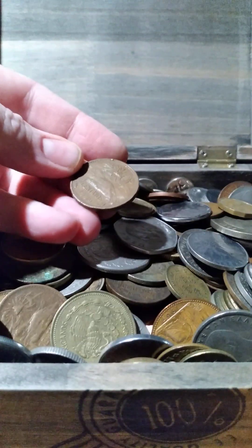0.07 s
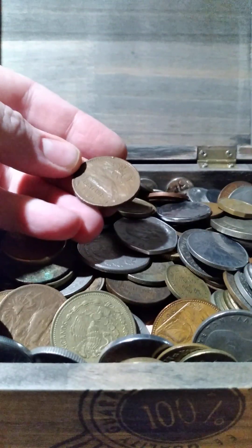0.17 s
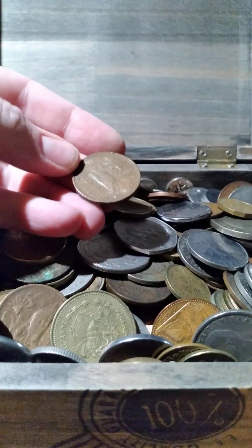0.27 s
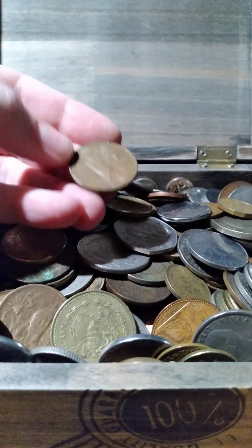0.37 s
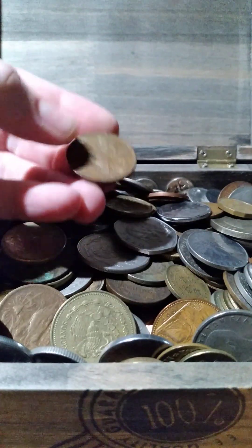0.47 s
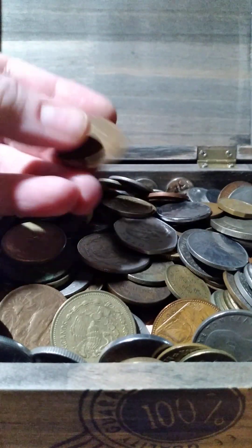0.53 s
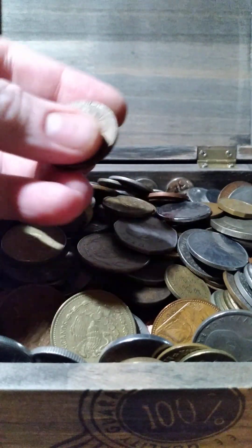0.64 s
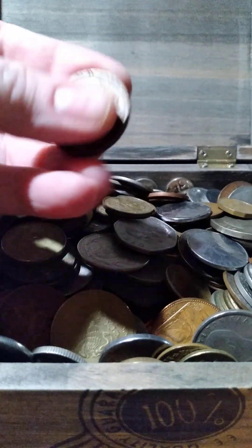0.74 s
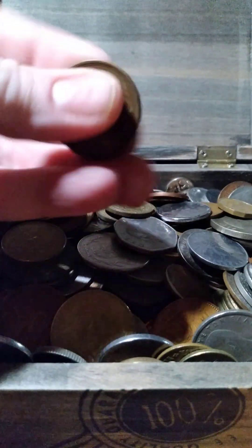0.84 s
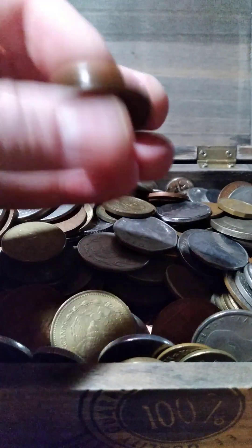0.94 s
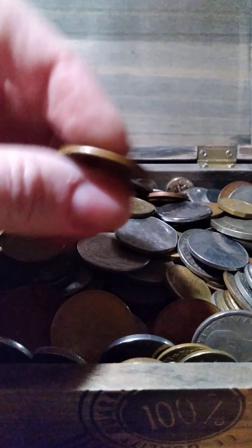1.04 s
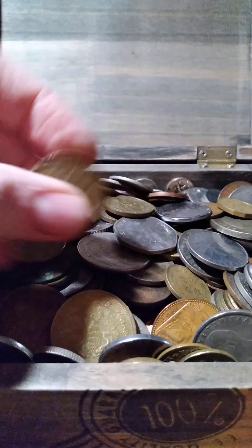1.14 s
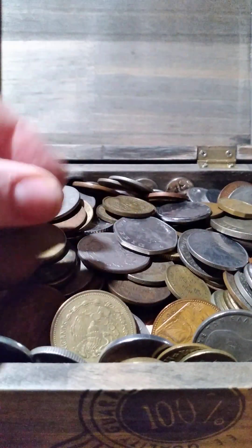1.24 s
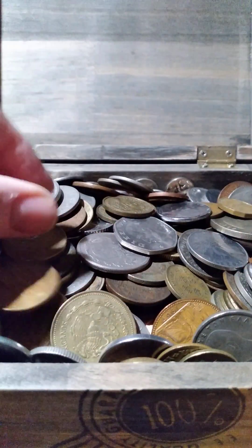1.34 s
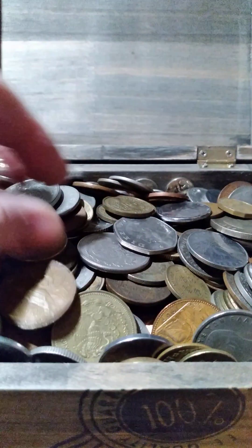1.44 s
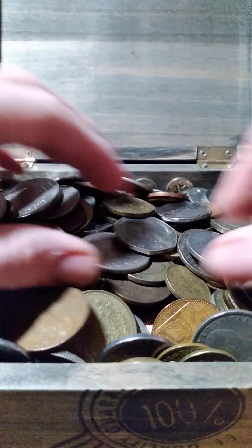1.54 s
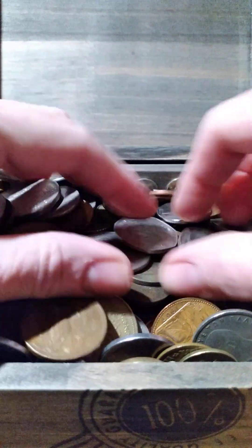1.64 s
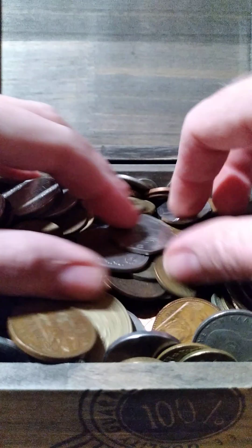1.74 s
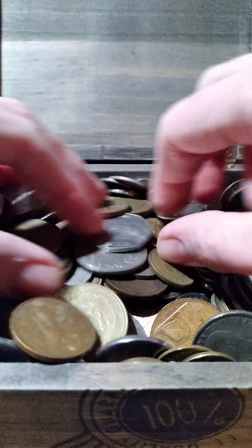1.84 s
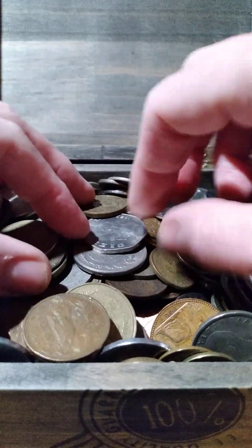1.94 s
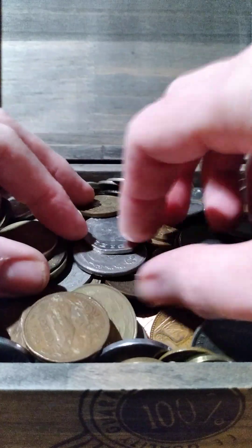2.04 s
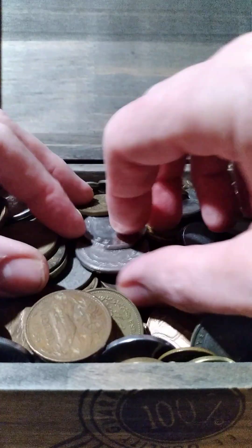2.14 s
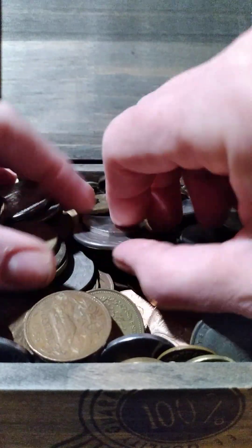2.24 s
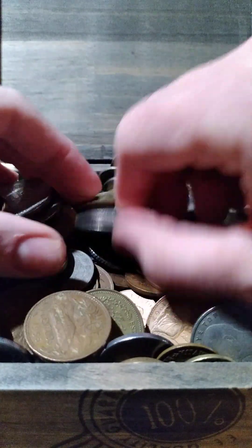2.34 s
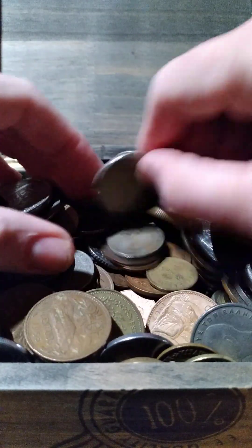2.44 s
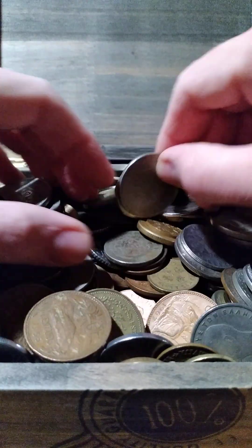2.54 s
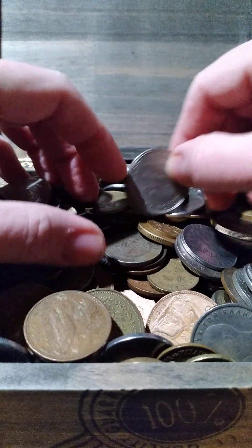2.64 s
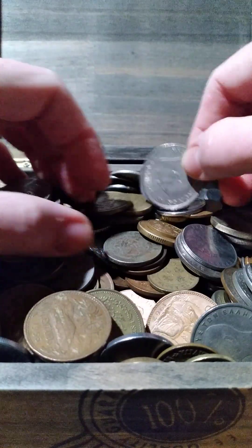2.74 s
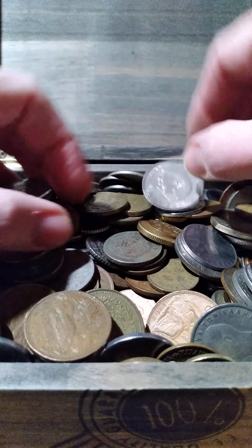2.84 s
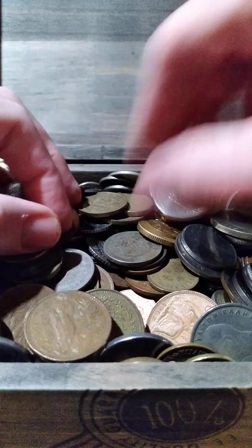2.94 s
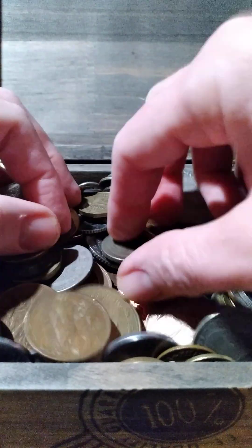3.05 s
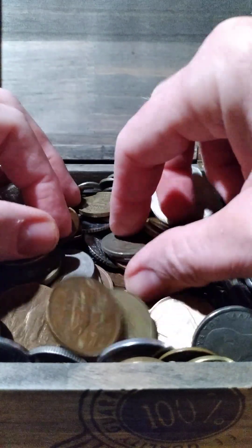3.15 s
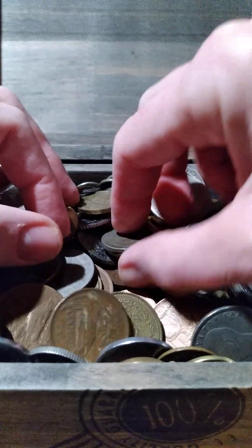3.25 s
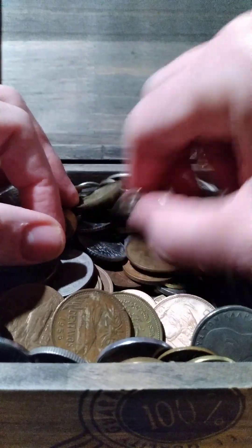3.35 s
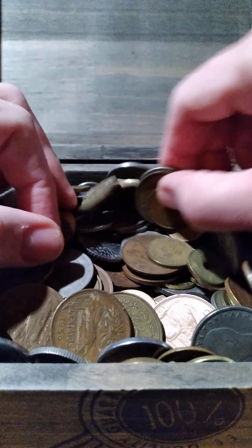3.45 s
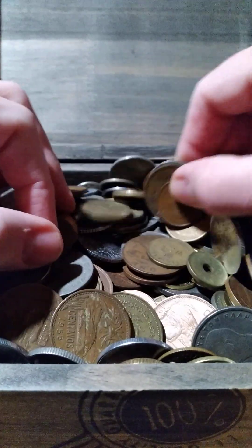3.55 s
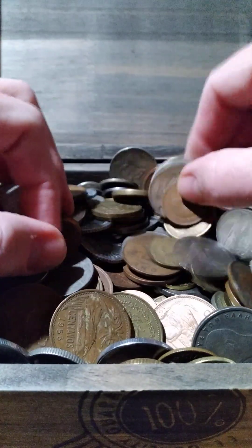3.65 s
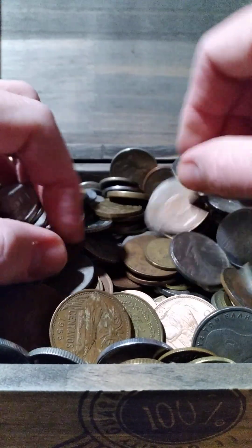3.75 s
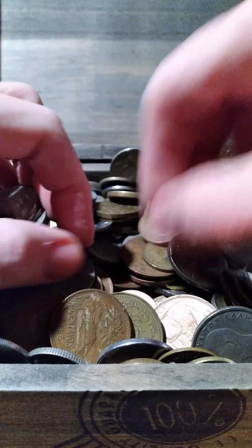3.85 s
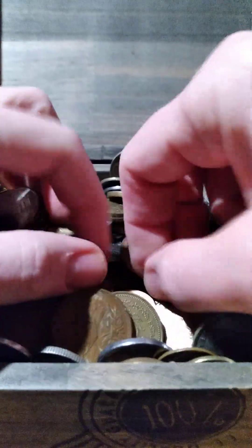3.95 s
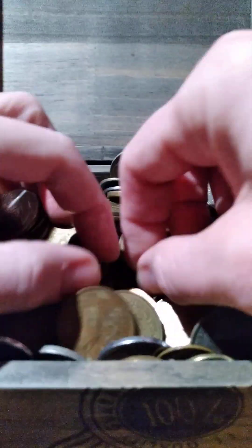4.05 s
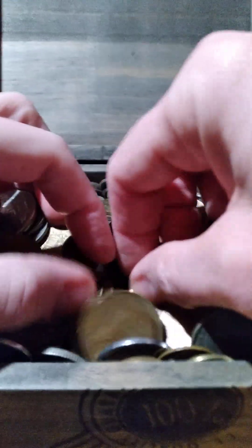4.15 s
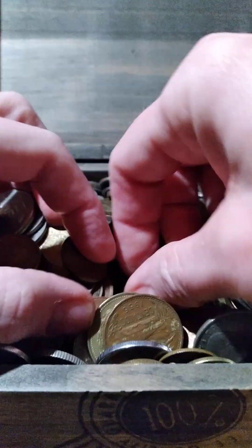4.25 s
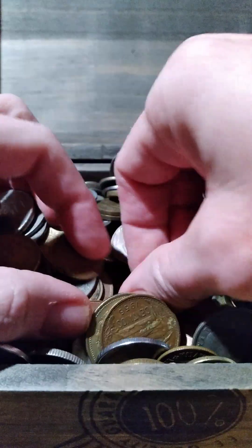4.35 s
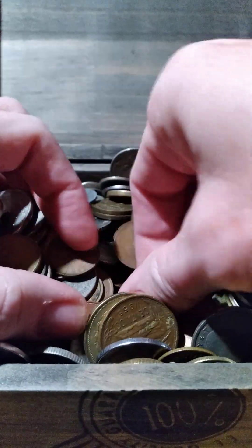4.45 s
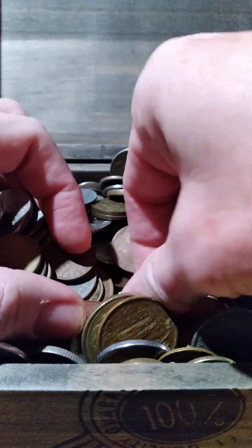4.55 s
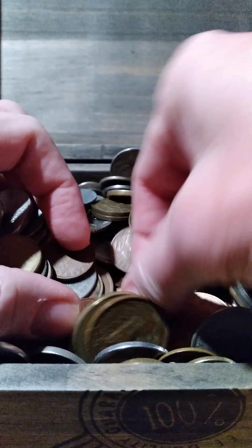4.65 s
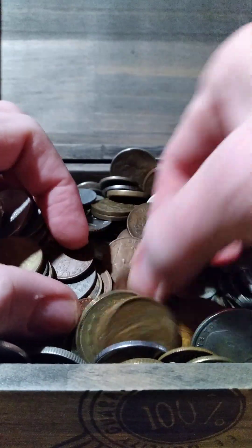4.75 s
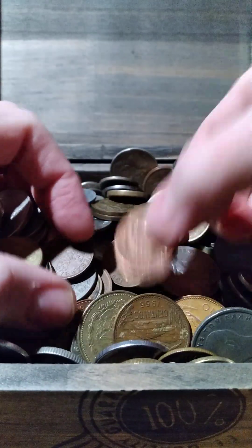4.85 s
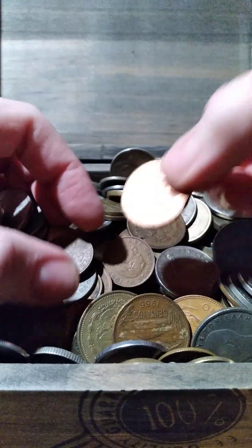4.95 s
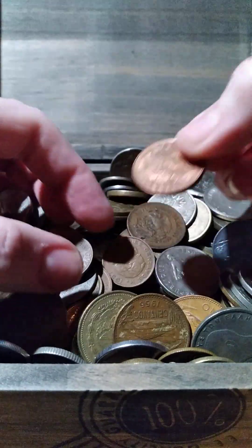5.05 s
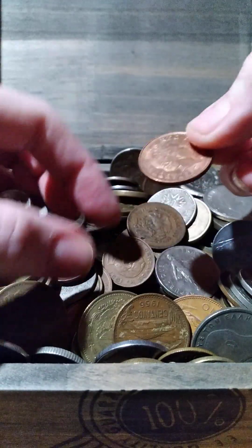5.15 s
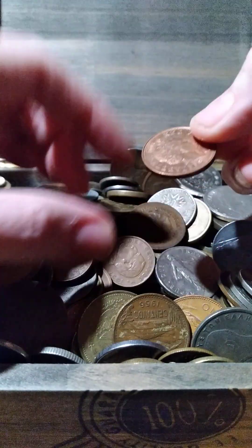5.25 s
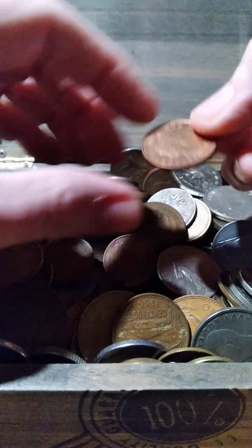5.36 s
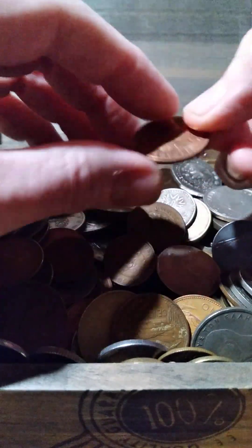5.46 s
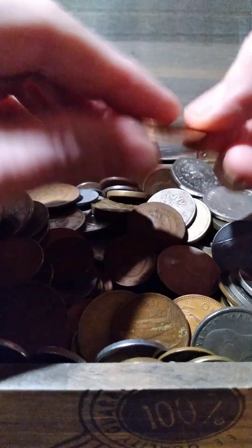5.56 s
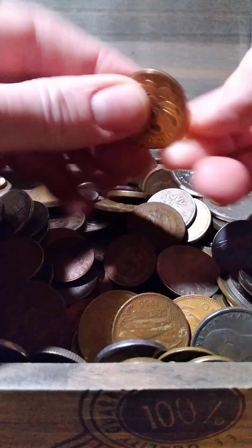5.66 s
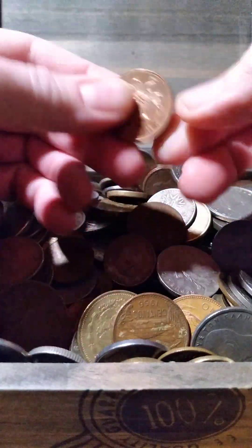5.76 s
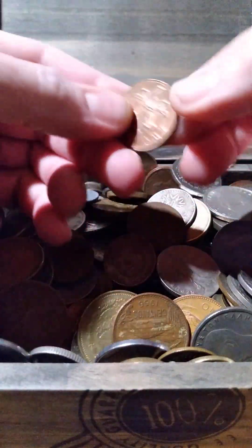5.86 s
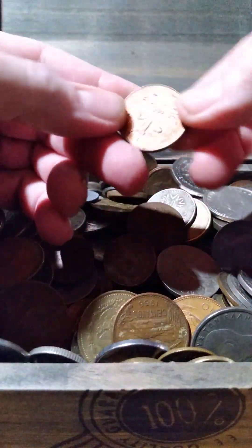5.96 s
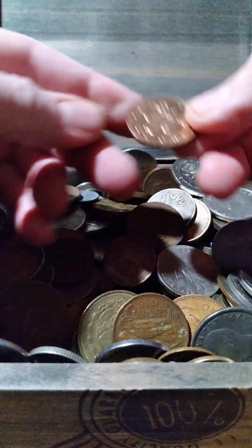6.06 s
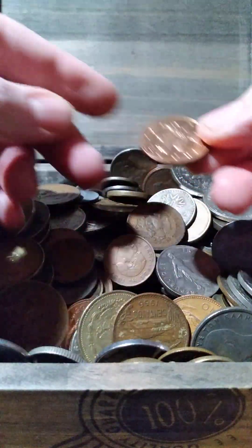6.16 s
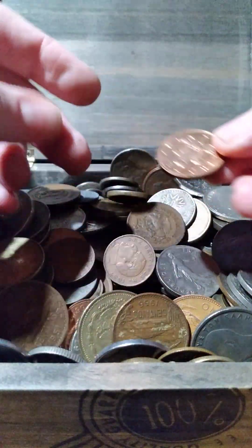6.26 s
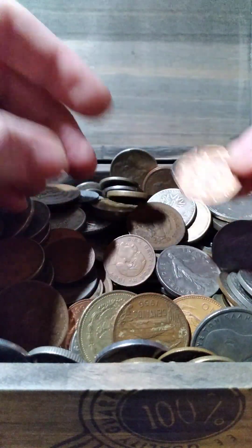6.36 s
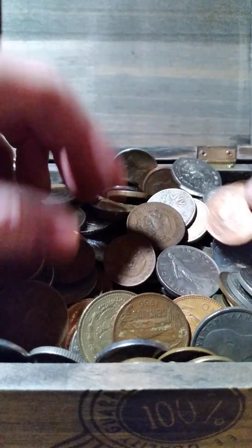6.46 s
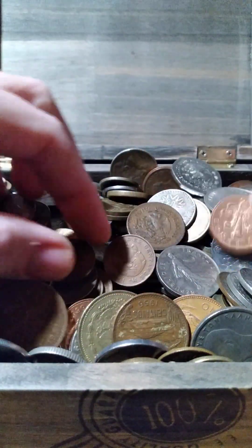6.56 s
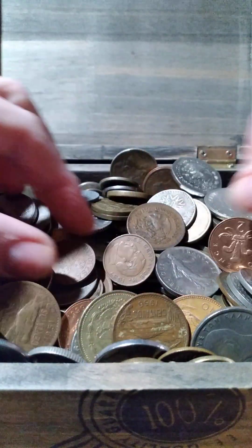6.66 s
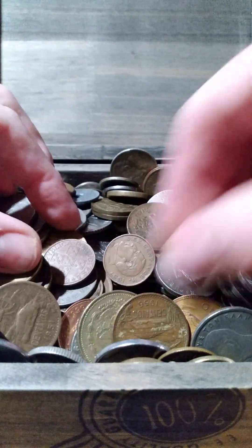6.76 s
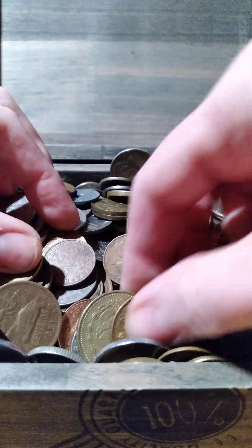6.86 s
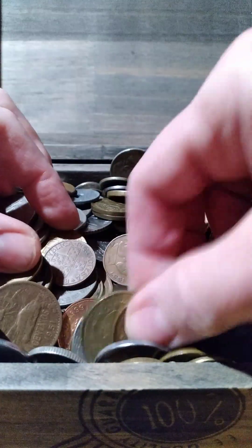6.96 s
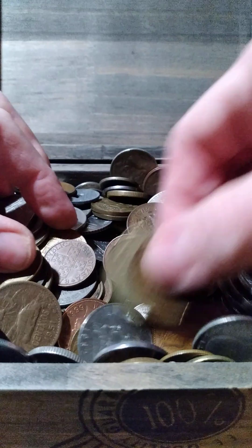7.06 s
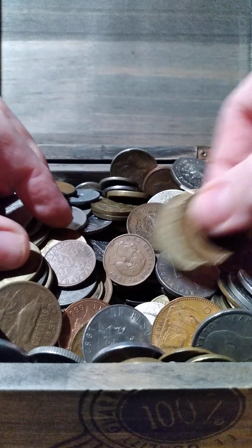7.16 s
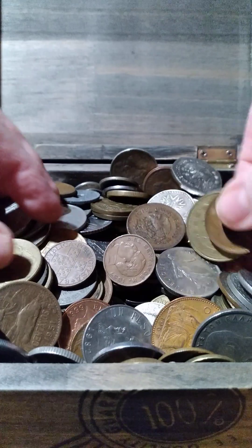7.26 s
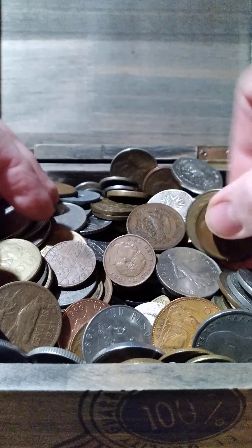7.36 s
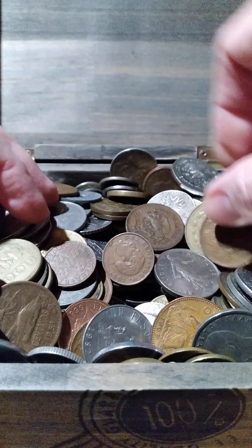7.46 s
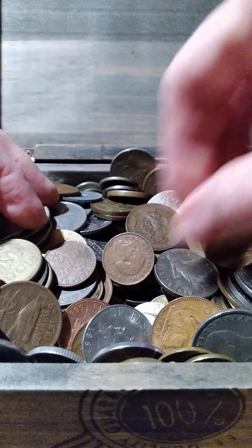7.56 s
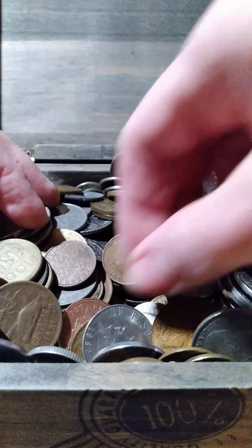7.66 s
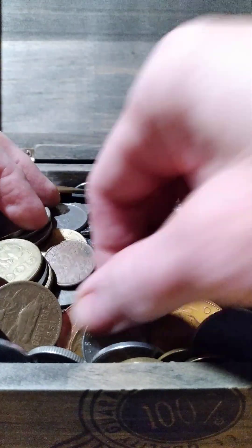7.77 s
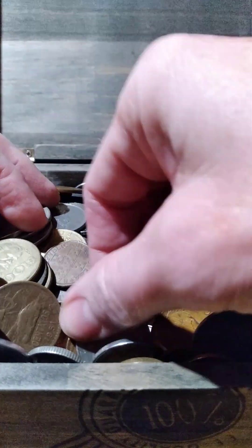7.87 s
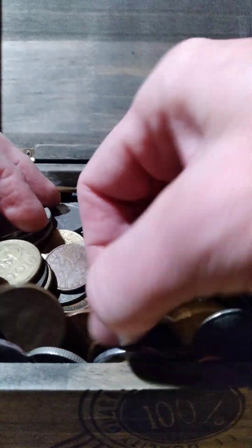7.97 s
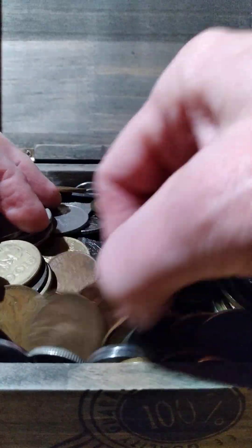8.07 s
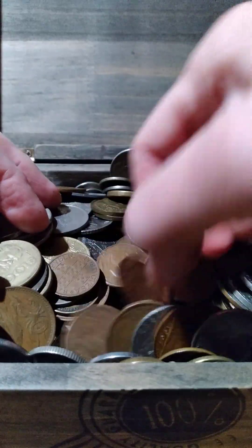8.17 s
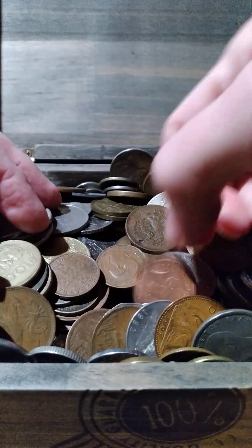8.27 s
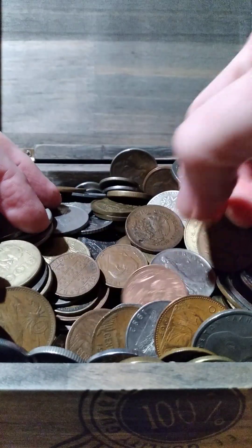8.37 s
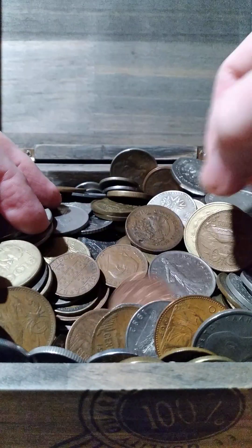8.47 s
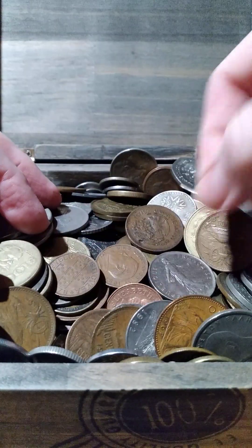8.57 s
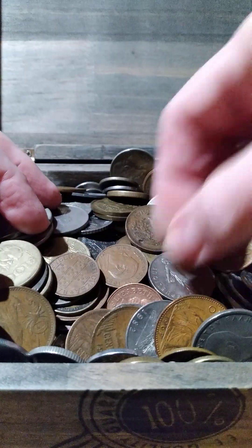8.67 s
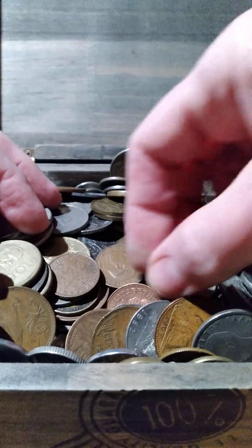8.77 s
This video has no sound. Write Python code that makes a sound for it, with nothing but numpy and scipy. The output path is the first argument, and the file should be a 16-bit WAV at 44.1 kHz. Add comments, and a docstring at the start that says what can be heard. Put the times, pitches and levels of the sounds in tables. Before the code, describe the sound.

Close, dry jingle of coins stirred by hand in a wooden box, with sharp clinks, brief rings, light ticks and soft wooden bumps.

```python
"""Coins raked in a wooden box

Fingers rake through a heap of coins in an open wooden box, close by in a quiet room.
Each contact is a noise crack with short modes, damped by the heap; a loose coin rings on two sines.
Knocks add a clack of noise and box resonances; shifts of the heap add low noise thuds.
An effort curve drives noise for sliding faces and dense runs of contacts for tumbling coins.
Rubs, scrapes and squeaks are swells of filtered noise, over a faint coloured room noise."""
import sys
import numpy as np
from scipy import signal
from scipy.fft import rfft, irfft, next_fast_len
from scipy.io import wavfile
from scipy.ndimage import uniform_filter1d, minimum_filter1d

SR = 44100
rng = np.random.default_rng(int(sys.argv[2]) if len(sys.argv) > 2 else 0)


def transcribe(signal):
    """Save signal, clipped to [-1, 1], as a 16-bit WAV file at the path in sys.argv[1]."""
    frames = np.atleast_2d(signal).T
    limited = np.clip(frames, -1, 1)
    pcm = np.round(limited * 32767).astype(np.int16)
    wavfile.write(sys.argv[1], SR, pcm)


N = 388962
TIME = np.arange(N) / SR  # the whole scene, s
AGE = np.arange(4096) / SR  # time since one contact, s

# Event levels are relative: the function that plays a table may add its own trim.
# A swell has a centre and a half-length, at which it has fallen to 1/e of its height.

# The fingers push through the heap. Each row: start in seconds, length in seconds, effort in dB.
STROKES = [(1.44, 0.034, -25), (1.70, 0.13, -27), (1.835, 0.088, -19.5), (2.18, 0.17, -31),
           (2.255, 0.058, -21), (2.52, 0.051, -20), (3.09, 0.2, -22), (3.33, .14, -26), (3.50, 0.24, -30),
           (3.73, 0.13, -23), (4.00, 0.067, -27), (4.18, 0.037, -25), (4.37, 0.1894, -36),
           (4.718, .16, -23), (6.55, 0.091, -33), (7.02, 0.14, -26), (7.45, 0.086, -24),
           (7.97, 0.37, -24.5)]
# The fingers lie in the heap and barely move it. Each row: start in seconds, length in seconds.
TOUCHES = [(1.359, 2.41), (3.993, 0.6), (7.802, 0.68)]
# One coin glides lightly over another or through the fingers.
# Each row: centre in seconds, effort in dB, half-length in seconds.
GLIDES = [(.33, -61.5, 0.072), (.66, -58, 0.12), (1.0, -57, 0.05), (4.62, -47, 0.026), (5.42, -58, 0.102),
          (5.69, -53, 0.038), (5.9, -59.5, 0.211), (6.78, -46, .05), (7.0, -34, 0.023), (8.56, -40, 0.049)]
# Light ticks of a coin turned in the fingers.
# Each row: start in seconds, coin level in dB, dull knock level in dB.
TICKS = [(0.414, -27.5, -73), (0.9716, -42, -57), (5.2488, -27, -56), (5.331, -19.5, -62),
         (5.7914, -18, -51), (5.8036, -3, -51.5), (5.8412, -18.5, -62), (5.941, -27, -64.5),
         (5.9716, -19, -56.5), (6.0648, -26, -75.5), (6.124, -20.5, -53.5), (6.2335, -18, -68),
         (6.916, -38, -58)]
# A coin snapped over between the fingers.
# Each row: start in seconds, coin level in dB, clack level in dB, ring frequency in Hz.
SNAPS = [(0.5838, -3.5, -32.5, 10390), (0.599, -19.5, -20, 8100), (0.6035, -6, -24, 7800)]
# Fingers rubbing on the held coin. Each row: centre in seconds, level in dB, half-length in seconds.
RUBS = [(0.618, -41.5, 0.028), (0.708, -55, 0.078), (0.964, -57, 0.04)]
# The loudest knocks of coin on coin.
# Each row: start in seconds, coin level in dB, box clack level in dB.
CLINKS = [(1.3491, -2.5, -27.5), (1.4008, -5, -37), (1.4613, -10.5, -34.5), (1.532, -2, -46),
          (1.5855, -4, -28.5), (1.607, -6.5, -34), (1.693, -3, -37.5), (1.744, 0, -35), (1.7854, -1.5, -35),
          (1.938, -1.5, -39.5), (2.0228, 2, -31), (2.161, -10, -47), (2.1791, -7, -44.5), (2.195, -7, -42),
          (2.263, 1, -35.5), (2.2945, 3, -30.5), (2.4669, -2.5, -30), (2.5142, -5, -27.5),
          (2.5222, -4.5, -22), (2.603, -10.5, -43.5), (2.7048, -7, -54.5), (2.838, -9.5, -49.5),
          (2.8904, -6.5, -42), (2.9109, -0.5, -30.5), (3.0079, -7, -50), (3.0457, -8.5, -44.5),
          (3.0991, 1.5, -33), (3.147, -5.5, -29.5), (3.221, -1.5, -24.5), (3.284, -6, -35.5),
          (3.318, -1, -35.5), (3.3425, 2.5, -32), (3.3942, 5.5, -31), (3.4475, -0.5, -34),
          (3.5185, -1.5, -38.5), (3.6179, -1.5, -28), (3.729, 1, -42.5), (3.865, -6, -42),
          (3.9971, -7, -46), (4.0427, -2, -42), (4.206, -3, -40), (4.2539, -11, -47), (4.2692, 0, -33.5),
          (4.4298, -8, -56.5), (4.4755, -12.5, -63), (4.508, -9, -57.5), (4.5471, -5.5, -50),
          (4.6761, -19, -62.5), (4.7107, -13, -47), (4.855, -3.5, -37), (4.9578, -14, -58.5),
          (5.3813, -12, -48), (6.4319, -9, -44.5), (6.6734, -2, -32), (6.6819, -7, -32.5),
          (7.0837, -10, -44.5), (7.115, -10, -40), (7.331, 2, -37), (7.4192, -3.5, -40.5),
          (7.4811, -2.5, -31), (7.5434, -2, -37), (7.8122, -27, -44.5), (7.881, -9, -41.5),
          (7.8978, -3, -40.5), (7.9991, 1, -33.5), (8.065, -7.5, -39), (8.098, 0, -38), (8.1899, -5, -32.5),
          (8.2298, 1.5, -40.5), (8.2954, 4.5, -36), (8.3592, -1.5, -31.5), (8.4228, -12.5, -58)]
# Free rings of coins, and a brief low buzz on the left under the loud ring at 1.35 s.
# Each row: start in seconds, key of the mode pair, lower mode level in dB,
# upper mode level in dB, time in seconds until it is stopped.
RINGS_AND_BUZZ = [(1.352, "clear", -6.5, -23, 0.031), (1.352, "deep", -30, -38, 0.016),
                  (1.402, "clear", -26.5, -21, 0.063), (1.452, "clear", -11, -27, 0.032),
                  (1.744, "dull", -13, -36, 0.01), (2.526, "tiny", -12, -14, 0.034),
                  (3.074, "dull", -32, -20.5, 0.021), (3.147, "high", -12, -25, 0.055),
                  (3.16, "clear", -20, -23, 0.055), (3.21, "clear", -21.5, -12.5, 0.017),
                  (3.236, "clear", -13.5, -29, 0.06), (3.325, "clear", -20, -33, 0.023),
                  (3.733, "middle", -9, -20, 0.014), (3.811, "middle", -20, -28, .06),
                  (4.762, "middle", -20.5, -25, 0.012), (7.087, "middle", -22.5, -40, 0.034),
                  (7.332, "middle", -13, -32, 0.021), (7.49, "high", -28, -33, 0.041),
                  (8.032, "middle", -14.5, -39, 0.032)]
# Rims scraping across the heap. Each row: centre in seconds, level in dB, half-length in seconds.
SCRAPES = [(1.85, -43.5, 0.16), (4.41, -51, 0.027), (4.81, -48, 0.1), (5.375, -56, 0.019),
           (5.92, -67, .018), (6.60, -44.5, 0.059), (7.04, -39.5, 0.057), (8.02, -34.5, 0.046),
           (8.575, -42.5, 0.017)]
# The heap shifts and bumps the box. Each row: start in seconds, level in dB, centre frequency in Hz.
THUDS = [(2.025, -40, 80), (2.293, -41, 100), (2.522, -32.5, 77), (2.908, -48, 60), (3.153, -34.5, 120),
         (3.22, -38.5, 89.2), (4.185, -34.5, 186), (6.683, -43, 65.06), (7.482, -47, 94.9)]
# A fingertip squeaks on a coin's face. Each row: centre in seconds, level in dB, half-length in seconds.
SQUEAKS = [(5.44, -60, 0.023), (5.50, -79, .04)]

# Mode pairs by key: those of coins, and that of the buzz, the one whose modes lie below 4 kHz.
# Each row: lower mode in Hz, upper mode in Hz, left over right in dB when it sounds alone.
MODE_PAIRS = {"clear": (7745, 13385, 10), "dull": (7480, 9600, 3), "high": (10265, 12788, 9),
              "middle": (8790, 14725, 7), "tiny": (11955, 13000, -1), "deep": (2240, 3600, 20)}
# Resonances of the box. Each row: frequency in Hz, level in dB.
BOX_MODES = [(255, -24), (795, -20), (1730, -20)]
# Spectrum of metal striking metal. Each row: frequency in Hz, relative level in dB per Hz.
METAL_SPECTRUM = [(1500, -65.5), (6000, -17.5), (7800, -3), (8700, 2.5), (10000, -3), (11300, -12.5),
                  (13400, -15.5), (16000, -16.5)]
# Spectrum of sliding coin faces. Each row: frequency in Hz, relative level in dB per Hz.
SLIDE_SPECTRUM = [(3500, -32.5), (6000, -20), (8300, 1.5), (12000, -17), (16000, -23)]
# Spectrum of the wooden box. Each row: frequency in Hz, relative level in dB per Hz.
WOOD_SPECTRUM = [(50, -18), (230, -3.5), (1300, -3.5), (1800, -3.5), (2700, -5.5), (5000, -5),
                 (14000, -9.5)]
# Spectrum of the quiet room. Each row: frequency in Hz, relative level in dB per Hz.
ROOM_SPECTRUM = [(25, -21), (80, -5.5), (600, -28), (16000, -40)]

ROOM_DB = -82
TOUCH_DB = -39  # effort of a resting touch
GRIP_S = .012  # a push builds up over this time
SETTLE_DB_PER_S = 390  # the heap comes to rest after a push or a knock
UNSETTLE_DB = -26.5  # effort given to a knock, against its coin level


def from_db(db):
    """Logarithmic levels: decibels to amplitude gain."""
    return 10 ** (np.asarray(db) / 20)


def unit(x):
    """Normalisation: scale to rms 1."""
    return x / np.sqrt(np.mean(x ** 2) + 1e-20)


def fade(t, t60):
    """Exponential decay: 60 dB are lost in t60 seconds."""
    return from_db(-60 * t / t60)


def pan(left_db):
    """Intensity stereo: gains that set the left side left_db above the right."""
    return from_db(np.array([[left_db], [-left_db]]) / 2)


def add(track, s, sound):
    """Superposition: mix a short stereo sound in at time s."""
    at = max(round(s * SR), 0)
    track[:, at:at + sound.shape[1]] += sound[:, :N - at]


def sine(hz, phase=0):
    """Simple harmonic motion: a steady tone as long as one contact."""
    return np.sin(2 * np.pi * hz * AGE + phase)


def stereo_noise(size, alike):
    """Partial coherence: white noise whose two sides correlate by alike."""
    mid, side = rng.standard_normal((2, size))
    alike = np.clip(alike, -1, 1)
    return np.sqrt(1 + alike) * mid + np.sqrt(1 - alike) * side * [[1], [-1]]


def band_pass(x, low_hz, high_hz):
    """Band limitation: keep one band, at rms 1."""
    return unit(signal.sosfilt(signal.butter(2, [low_hz, high_hz], "band", fs=SR, output="sos"), x))


def coloured(x, spectrum):
    """Minimum phase: a causal filter built from the spectrum by folding its cepstrum."""
    size = next_fast_len(x.shape[-1], True)
    hz, db = np.transpose(spectrum)
    curve_db = np.interp(np.log(np.fft.rfftfreq(size, 1 / SR) + 1), np.log(hz), db)
    cepstrum = irfft(np.log(from_db(curve_db)), size)
    cepstrum[1:size // 2] *= 2
    cepstrum[size // 2 + 1:] = 0
    response = np.exp(rfft(cepstrum))
    return irfft(rfft(x, size) * response, size)[:, :x.shape[-1]]


def swells(rows):
    """Smooth envelopes: a rise and fall for every row of centre, dB and half-length."""
    out = np.zeros(N)
    for s, db, length in rows:
        near = np.abs(TIME - s) < 3 * length
        out[near] += from_db(db) * np.exp(-np.abs((TIME[near] - s) / length) ** 3)
    return out


def coin_voice(heap_t60=0.075, heap_db=-22, mode_db=-14, mode_t60=.021):
    """Impact excitation: a crack, its scatter through the heap and two damped mode pairs."""
    crack_t60, rise_s, detune, plate_q, spread_db = .004, .0003, .04, 12, 2.5
    envelope = fade(AGE, crack_t60) + from_db(heap_db) * fade(AGE, heap_t60)
    crack = stereo_noise(len(AGE), 0) * envelope
    # the grip of the heap shifts each mode a little and decides how long it lasts
    keys = rng.choice(list(MODE_PAIRS), size=2)
    pitches = [hz * rng.lognormal(sigma=detune) for key in keys for hz in MODE_PAIRS[key][:-1]]
    modes = np.zeros((2, len(AGE)))
    for hz in pitches:
        side_gains = rng.normal(size=(2, 1))
        modes += side_gains * sine(hz) * fade(AGE, mode_t60 * rng.lognormal(sigma=.5))
    # one of the modes also colours the crack
    plate = signal.iirpeak(rng.choice(pitches), plate_q, fs=SR)
    crack = crack + 2 * signal.lfilter(*plate, crack)
    onset = -np.expm1(-AGE / rise_s)
    contact = (crack + from_db(mode_db) * modes) * onset
    return unit(coloured(contact, METAL_SPECTRUM)) * pan(rng.normal(scale=spread_db))


def box_voice(knock_t60=0.016, cavity_t60=0.22, cavity_db=-23, mode_t60=0.074, detune=.04):
    """Structure-borne sound: the dry clack of a contact through the packed coins and the wood."""
    envelope = fade(AGE, knock_t60) + from_db(cavity_db) * fade(AGE, cavity_t60)
    clack = stereo_noise(len(AGE), 0.2) * envelope
    # the hands over the box detune its resonances from knock to knock
    modes = np.zeros((2, len(AGE)))
    for hz, db in BOX_MODES:
        side_gains = from_db(db) * rng.normal(size=(2, 1))
        modes += side_gains * sine(hz * rng.lognormal(sigma=detune))
    return unit(coloured(clack + modes * fade(AGE, mode_t60), WOOD_SPECTRUM))


def bounced(voice, gap_s, loss_db=2.5, uneven_db=6.5, count=8):
    """Repeated impact: the coin's edge touches first, then it chatters, on average losing strength."""
    out = voice / 2
    elapsed = np.cumsum(rng.gamma(4, gap_s / 4, count))
    # delays run from half to all of the elapsed time, so the gaps tend to widen
    delays = elapsed / 2 * np.linspace(1, 2, count)
    for k, delay in enumerate(delays):
        at = min(int(delay * SR), len(AGE) - 1)
        out[:, at:] += voice[:, :len(AGE) - at] * from_db(rng.normal(-loss_db * k, uneven_db))
    return out


def room():
    """Background noise: stationary noise with the spectrum of the quiet room."""
    return from_db(ROOM_DB) * unit(coloured(stereo_noise(N, .5), ROOM_SPECTRUM))


def surge(length):
    """Build-up and dissipation: the heap is set moving, kept moving for a while, and settles."""
    age = TIME[:int((length + .5) * SR)]
    return np.minimum(age / GRIP_S, 1) * from_db(-SETTLE_DB_PER_S * np.maximum(age - length, 0))


def finger_effort():
    """Dominant drive: the strongest push, touch or knock of the moment, plus the light glides."""
    touches = [(start, length, TOUCH_DB) for start, length in TOUCHES]
    knocks = [(s, 0, coin_db + UNSETTLE_DB) for s, coin_db, _ in CLINKS]
    effort = np.zeros(N)
    for start, length, db in list(STROKES) + touches + knocks:
        at = round(start * SR)
        shape = from_db(db) * surge(length)[:N - at]
        effort[at:at + len(shape)] = np.maximum(effort[at:at + len(shape)], shape)
    return effort + swells(GLIDES)


def jostle(voice, contacts, even_s=0.1, count=30):
    """Granular superposition: contacts dealt to many voices, with the slow level held at 1."""
    voices = [voice() for _ in range(count)]
    out = np.zeros((2, N))
    for s, size in contacts:
        add(out, s, size * voices[rng.integers(count)])
    power = uniform_filter1d(np.mean(out ** 2, axis=0), int(even_s * SR))
    return out / np.sqrt(np.abs(power) + 1e-12)


def stirring(per_s=95, busier=0.6, size_db=4.5, tumble_db=-46, coin_db=8.5, slide_db=5.0,
             wood_db=-12.5, catch_db=4.0, catch_s=0.0029):
    """Friction and impact: lightly touched coins slide and catch; pushed harder they tumble densely."""
    effort = finger_effort()
    push = effort / from_db(tumble_db)
    # contacts come at random, more often as the push grows
    times = TIME[rng.random(N) < per_s * (1 + push) ** busier / SR]
    sizes = from_db(size_db * np.minimum(rng.exponential(size=len(times)), 3.5))
    contacts = np.column_stack([times, sizes])
    sliding = 1 / np.hypot(1, push)
    tumbling = 1 - sliding
    catching = from_db(catch_db * unit(uniform_filter1d(rng.standard_normal(N), int(catch_s * SR))))
    friction = unit(coloured(catching * stereo_noise(N, 0), SLIDE_SPECTRUM))
    hiss = from_db(slide_db) * sliding * friction
    tumble = from_db(coin_db) * tumbling * jostle(coin_voice, contacts)
    wood = from_db(wood_db) * np.sqrt(tumbling) * jostle(box_voice, contacts)
    return effort * (hiss + tumble + wood)


def ticks(coin_trim_db=-22.0, knock_trim_db=-5.0, gap_s=0.0013, extra_left_db=3):
    """Finger damping: a coin held clear of the heap ticks with little scatter and a varying stutter."""
    out = np.zeros((2, N))
    for s, coin_db, dull_db in TICKS:
        stutter_s = gap_s * rng.lognormal(sigma=.5)
        coin = unit(bounced(coin_voice(heap_db=-35, mode_db=-24), stutter_s))
        knock = unit(bounced(box_voice(), stutter_s))
        add(out, s, coin * from_db(coin_db + coin_trim_db))
        add(out, s, knock * from_db(dull_db + knock_trim_db))
    return out * pan(extra_left_db)


def snaps(ring_t60=0.044, ring_trim_db=-8, coin_trim_db=-21, clack_trim_db=-9, gap_s=.0016):
    """Chatter with resonance: the held coin flips, rattles between the fingertips and rings briefly."""
    out = np.zeros((2, N))
    for s, coin_db, clack_db, hz in SNAPS:
        rattle = from_db(coin_trim_db) * unit(bounced(coin_voice(), gap_s))
        ring = from_db(ring_trim_db) * sine(hz) * fade(AGE, ring_t60)
        clack = from_db(clack_db + clack_trim_db) * box_voice()
        add(out, s, from_db(coin_db) * (rattle + ring) + clack)
    return out


def rubs(low_hz=290, high_hz=500, grit_hz=2200, grit_db=-17.0):
    """Dry friction: skin dragging on metal gives a soft low rustle with a little grit above it."""
    drag = stereo_noise(N, 0.72)
    rustle = band_pass(drag, low_hz, high_hz)
    grit = from_db(grit_db) * band_pass(drag, grit_hz / 2, grit_hz * 2)
    return swells(RUBS) * (rustle + grit)


def clinks(coin_trim_db=-17.5, clack_trim_db=-2.0, gap_s=.0014, usual_db=-38, longer=.3, heavier=0.057):
    """Impact depth: knocks that go far into the heap are heavier and chatter longer."""
    out = np.zeros((2, N))
    for s, coin_db, clack_db in CLINKS:
        depth_db = clack_db - usual_db
        chatter_s = gap_s * from_db(longer * depth_db)
        coin = unit(bounced(coin_voice(), chatter_s))
        clack = unit(bounced(box_voice(), chatter_s))
        add(out, s, coin * from_db(coin_db + coin_trim_db + heavier * depth_db))
        add(out, s, clack * from_db(clack_db + clack_trim_db))
    return out


def free_rings_and_buzz(free_t60=0.56, stopped_t60=0.05):
    """Free vibration: a loose coin sings on two jolted modes until stopped; the buzz is built alike."""
    out = np.zeros((2, N))
    jolts_per_s, jolt_db, jolt_rad = 130, 1.1, .4  # for a coin, the jolts are passing touches
    for s, key, low_db, high_db, free_s in RINGS_AND_BUZZ:
        low_hz, high_hz, left_db = MODE_PAIRS[key]
        # after free_s a faster decay is added: a neighbour or a finger stops the coin
        decay = fade(AGE, free_t60) * fade(np.maximum(AGE - free_s, 0), stopped_t60)
        for hz, db in (low_hz, low_db), (high_hz, high_db):
            touched = rng.random(len(AGE)) < jolts_per_s / SR
            jolts = np.cumsum(rng.standard_normal(len(AGE)) * touched)
            tone = sine(hz, jolt_rad * jolts + rng.random((2, 1)))
            add(out, s, from_db(db + jolt_db * jolts) * pan(left_db) * tone * decay)
    return out


def scrapes(per_s=600, low_hz=1500, high_hz=2050, rasp_db=-3.0):
    """Stick-slip pulses: a milled rim stutters over the other coins and sets the box rasping."""
    pulses = stereo_noise(N, 0.38) * (rng.random(N) < per_s / SR)
    slips = coloured(pulses, WOOD_SPECTRUM)
    rasp = from_db(rasp_db) * band_pass(slips, low_hz, high_hz)
    return swells(SCRAPES) * unit(unit(slips) + rasp)


def thuds(t60=0.11, trim_db=8.0):
    """Low-frequency impact: bumps of the box on the table, each about two octaves wide."""
    out = np.zeros((2, N))
    age = TIME[:2 * len(AGE)]
    for s, db, hz in THUDS:
        bump = band_pass(stereo_noise(len(age), 0.9) * fade(age, t60), hz / 2, hz * 2)
        add(out, s, from_db(db + trim_db) * bump / np.abs(bump).max())
    return out


def squeaks(hz=1720, width_hz=60):
    """Stick-slip friction: skin on metal in a narrow, rough tone, made of band-passed noise."""
    return swells(SQUEAKS) * band_pass(stereo_noise(N, 0.32), hz - width_hz, hz + width_hz)


def scene(left_db=3.0):
    """Superposition of sources: most of the handling lies a little to the left."""
    to_the_left = (stirring() + ticks() + snaps() + clinks() + scrapes()) * pan(left_db)
    return room() + to_the_left + rubs() + free_rings_and_buzz() + thuds() + squeaks()


def record(dry, ceiling=0.97, hold_s=0.0008):
    """Limiting and band limitation: a fast limiter on each channel, then bass and top are cut."""
    size = int(hold_s * SR) + 1
    needed_gain = ceiling / np.maximum(np.abs(dry), ceiling)
    gain = uniform_filter1d(minimum_filter1d(needed_gain, size), size)
    bottom = signal.butter(3, 44, "high", fs=SR, output="sos")
    top = signal.ellip(10, .2, 70, 16000, fs=SR, output="sos")  # low-pass, edge in Hz
    return np.clip(signal.sosfilt(np.vstack([bottom, top]), dry * gain), -1, 1)


dry = scene()
out = record(dry)
transcribe(out)
```